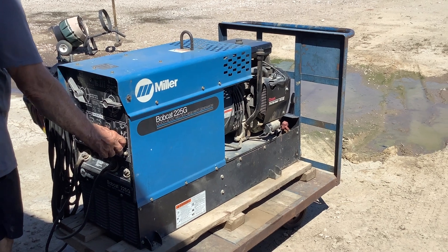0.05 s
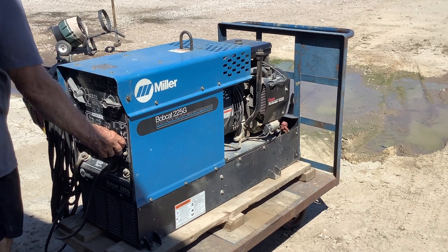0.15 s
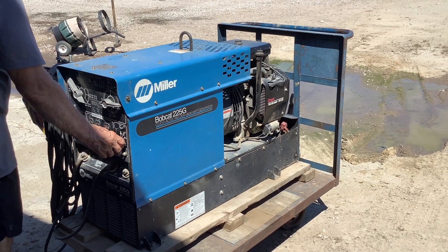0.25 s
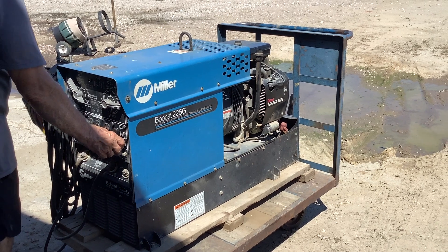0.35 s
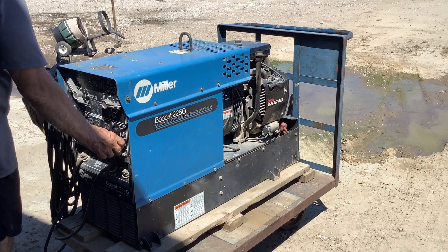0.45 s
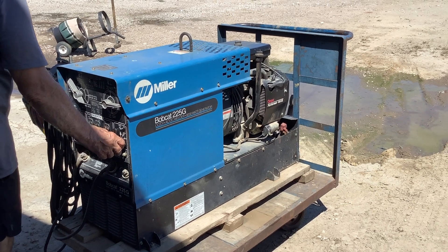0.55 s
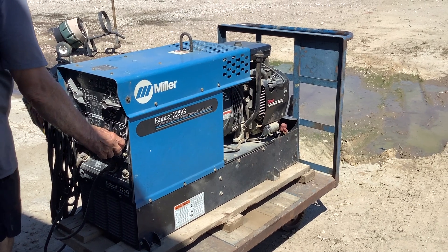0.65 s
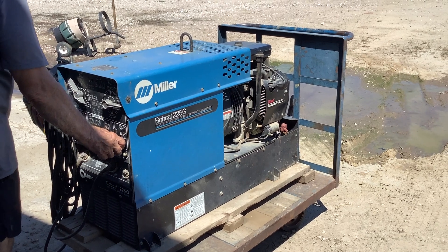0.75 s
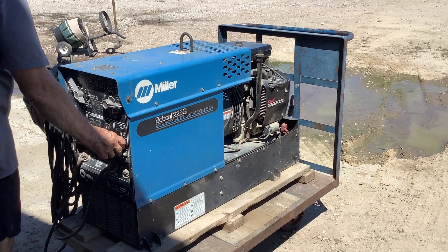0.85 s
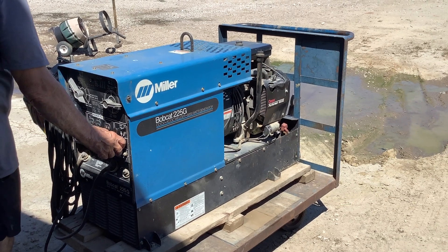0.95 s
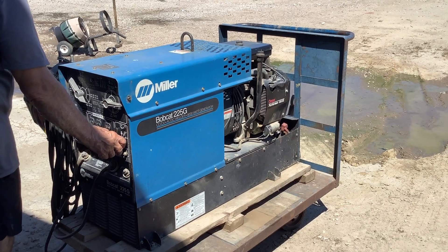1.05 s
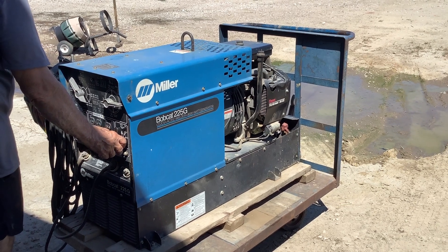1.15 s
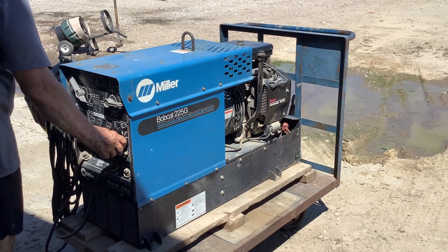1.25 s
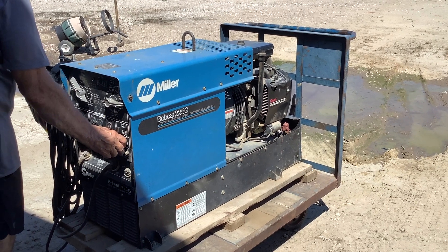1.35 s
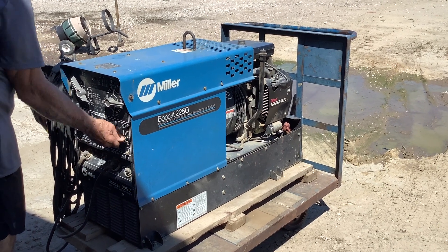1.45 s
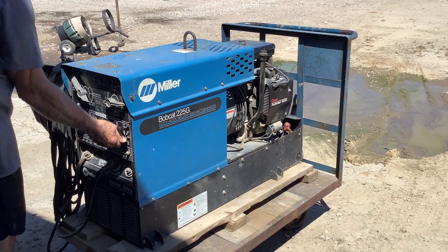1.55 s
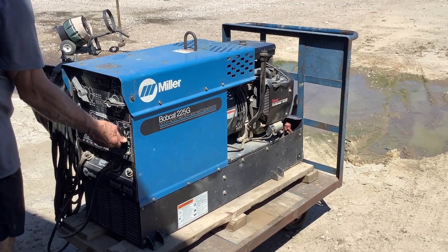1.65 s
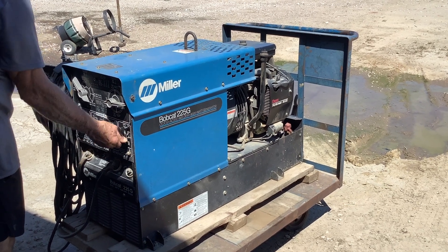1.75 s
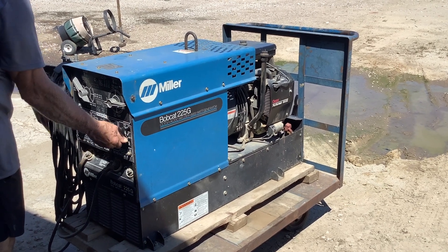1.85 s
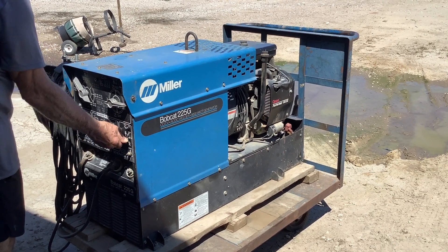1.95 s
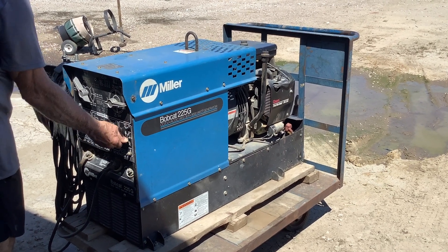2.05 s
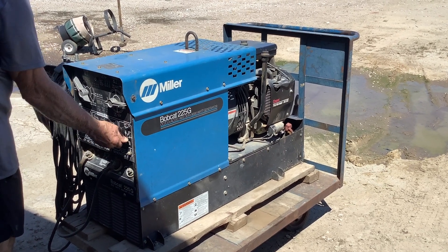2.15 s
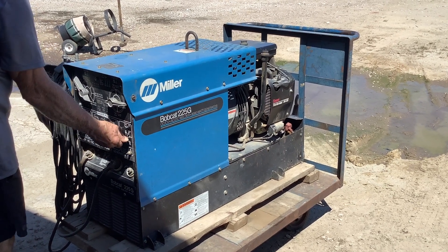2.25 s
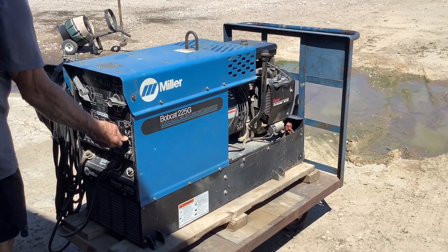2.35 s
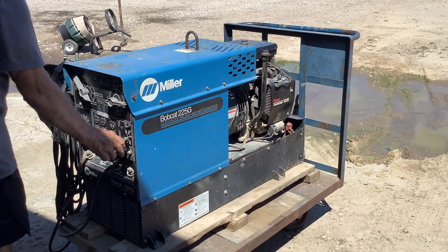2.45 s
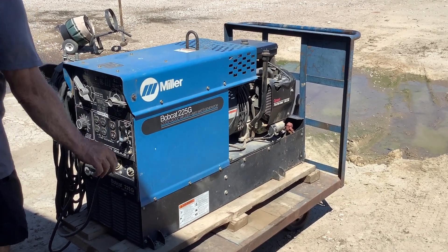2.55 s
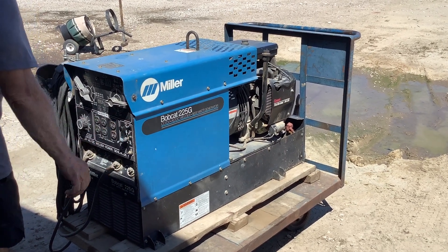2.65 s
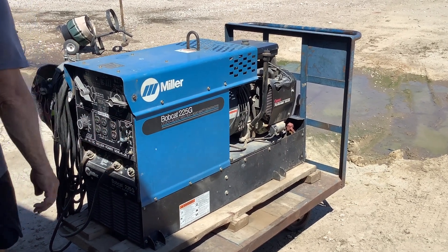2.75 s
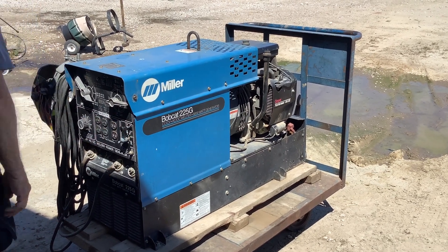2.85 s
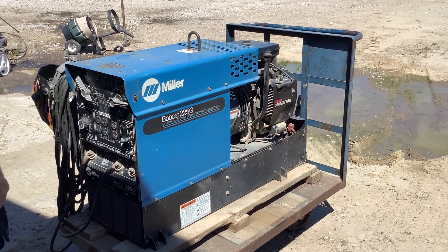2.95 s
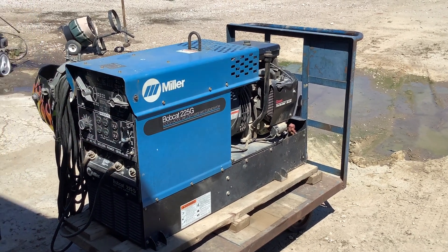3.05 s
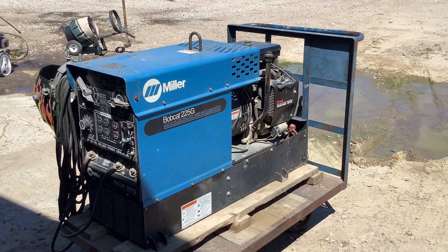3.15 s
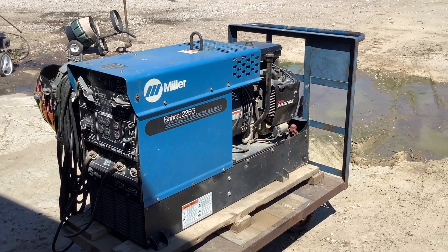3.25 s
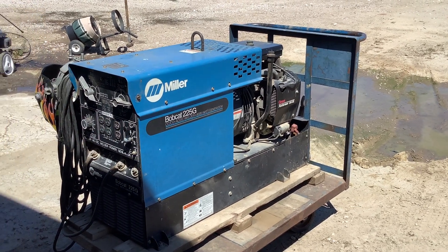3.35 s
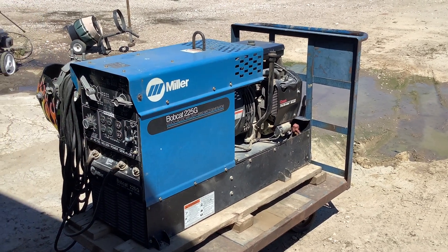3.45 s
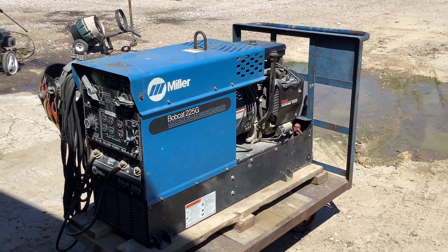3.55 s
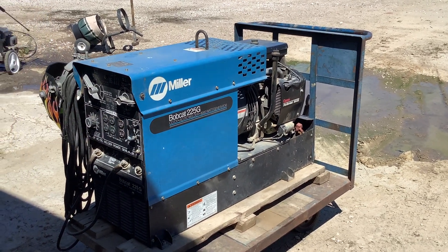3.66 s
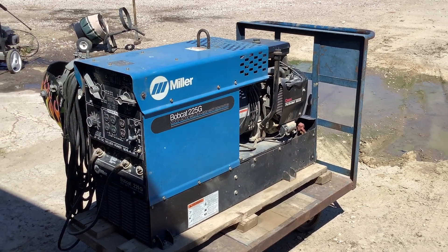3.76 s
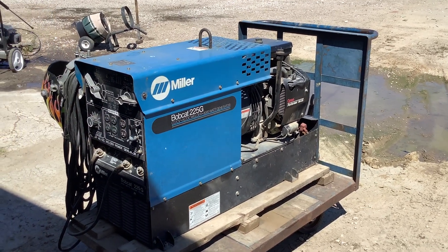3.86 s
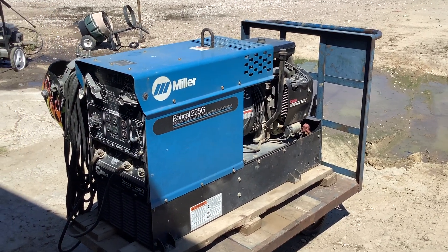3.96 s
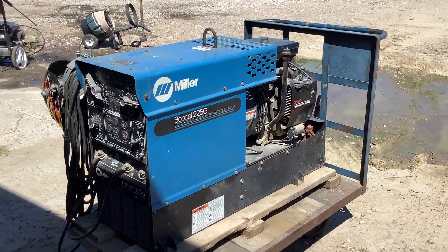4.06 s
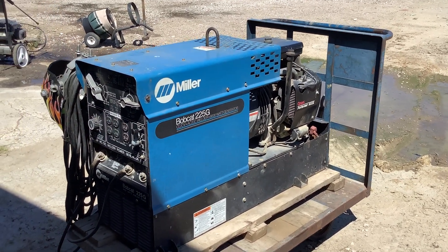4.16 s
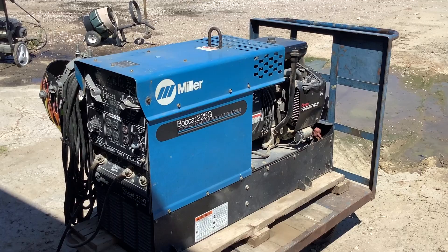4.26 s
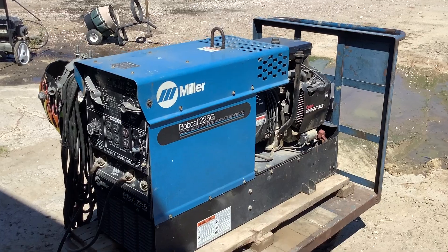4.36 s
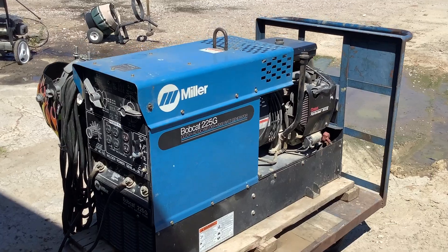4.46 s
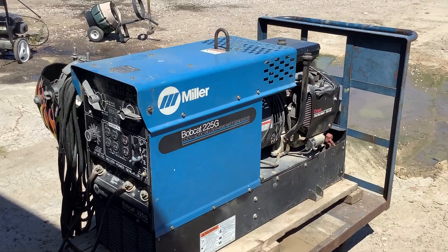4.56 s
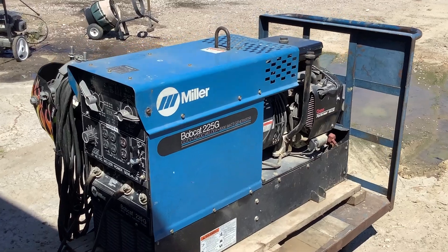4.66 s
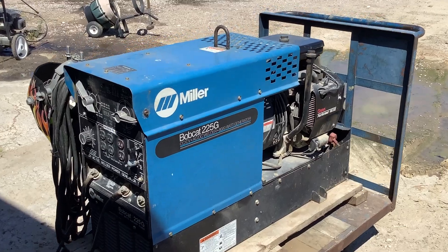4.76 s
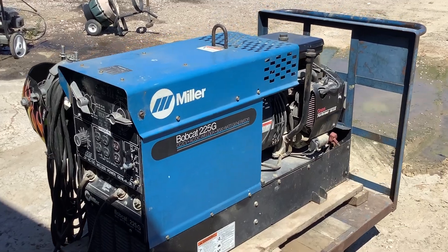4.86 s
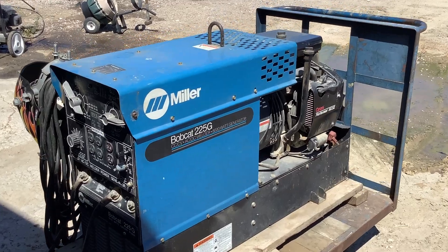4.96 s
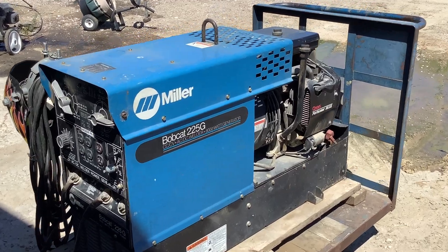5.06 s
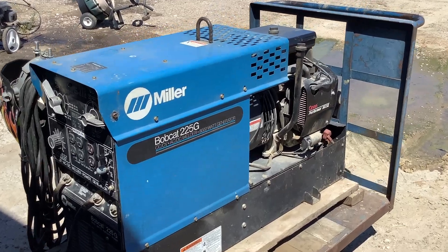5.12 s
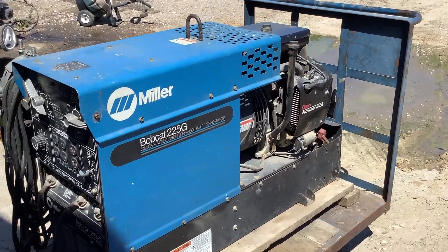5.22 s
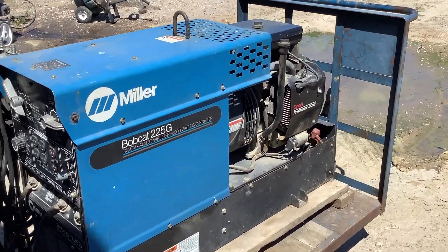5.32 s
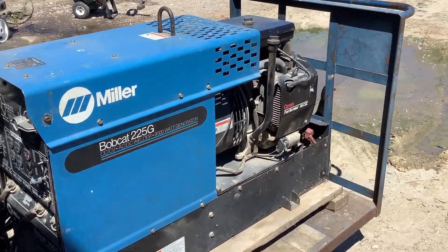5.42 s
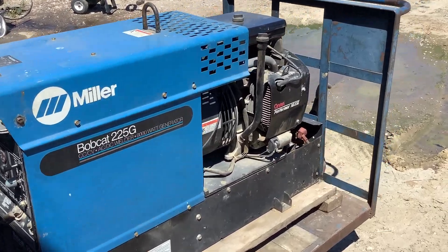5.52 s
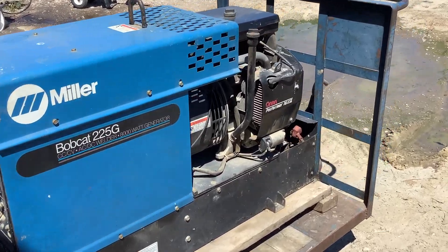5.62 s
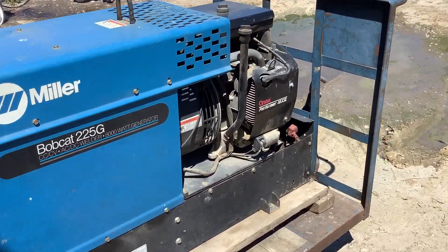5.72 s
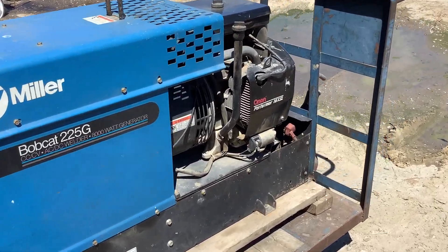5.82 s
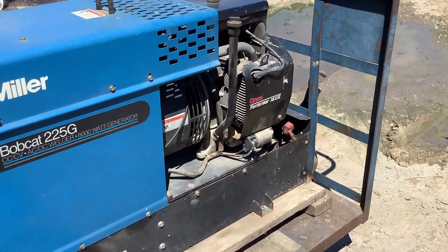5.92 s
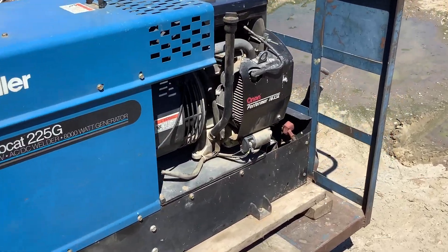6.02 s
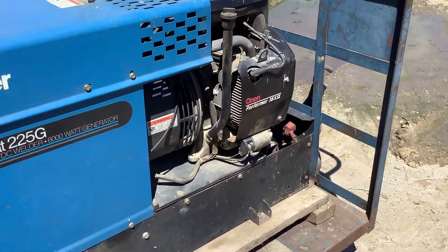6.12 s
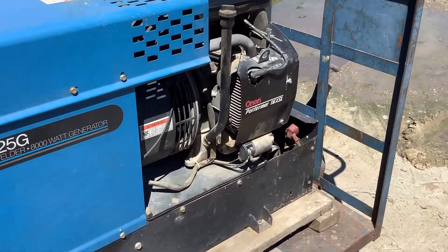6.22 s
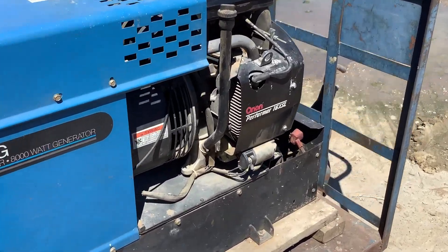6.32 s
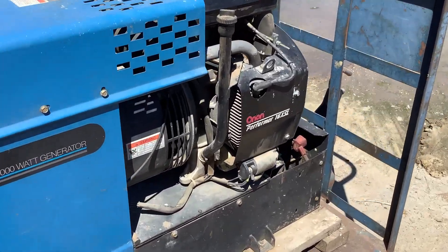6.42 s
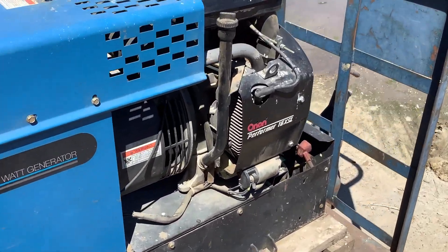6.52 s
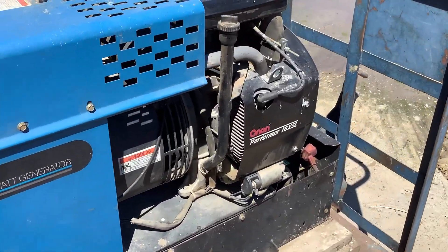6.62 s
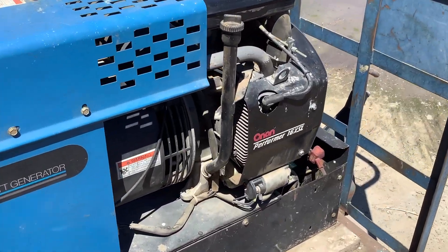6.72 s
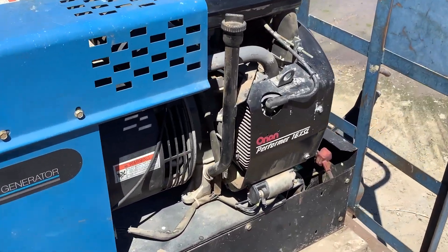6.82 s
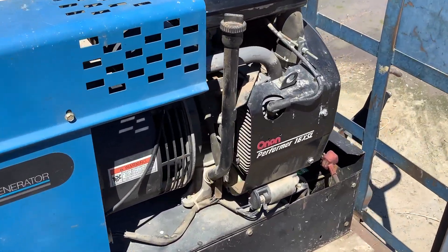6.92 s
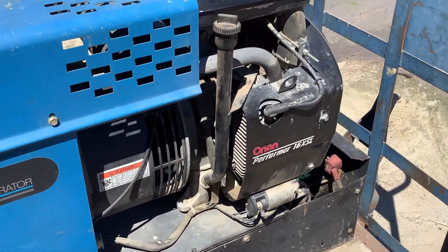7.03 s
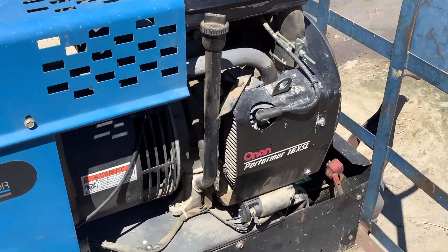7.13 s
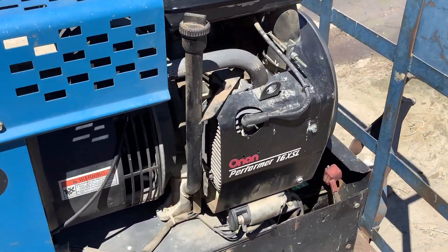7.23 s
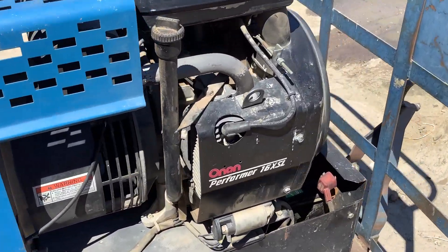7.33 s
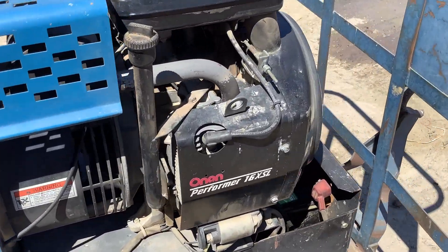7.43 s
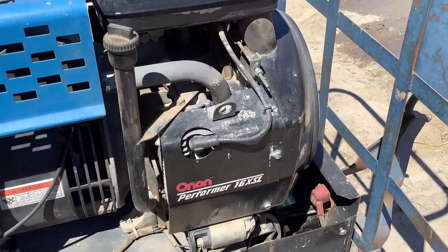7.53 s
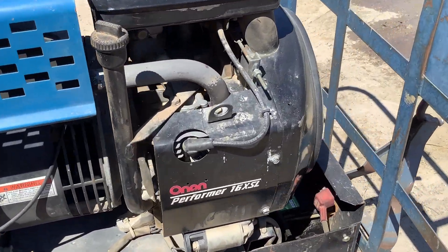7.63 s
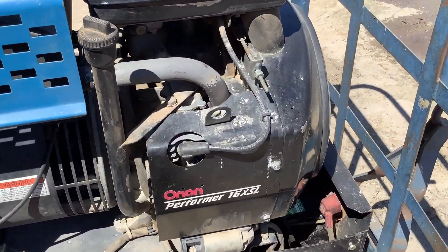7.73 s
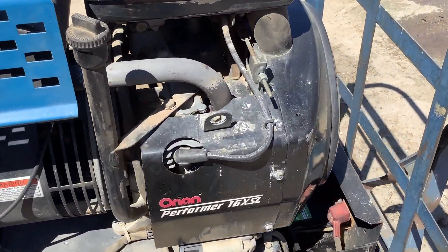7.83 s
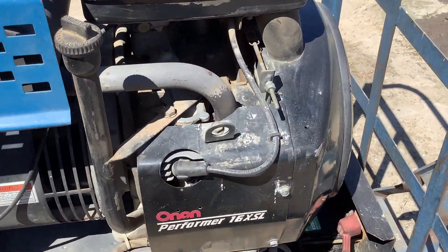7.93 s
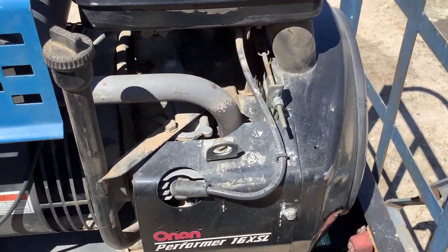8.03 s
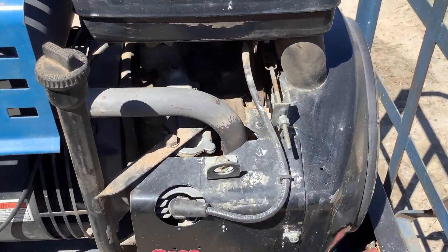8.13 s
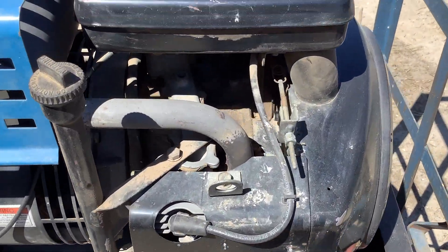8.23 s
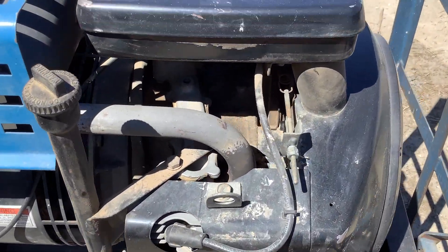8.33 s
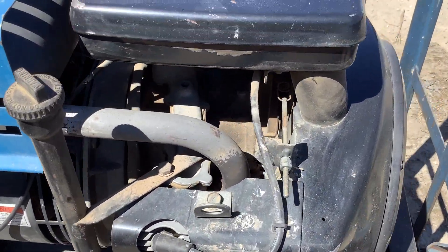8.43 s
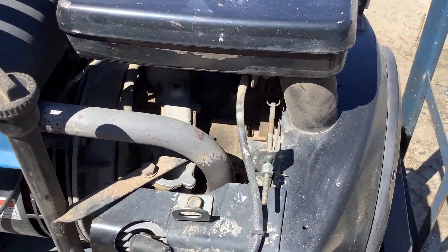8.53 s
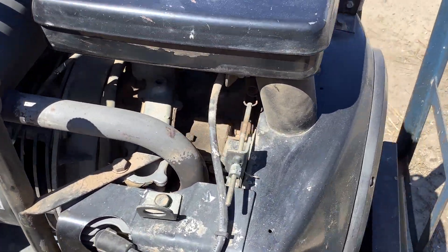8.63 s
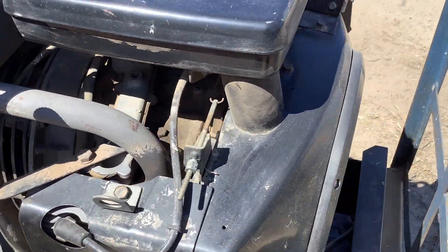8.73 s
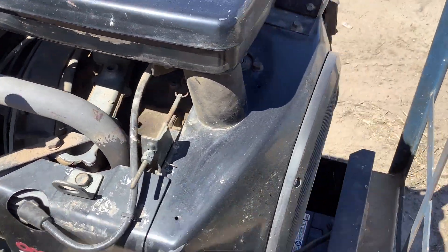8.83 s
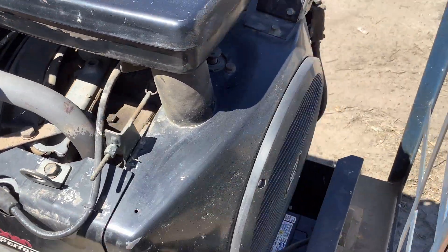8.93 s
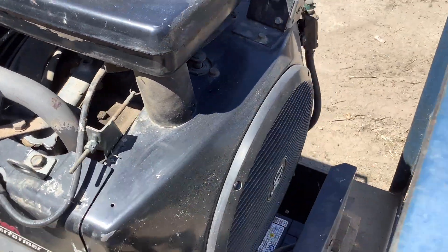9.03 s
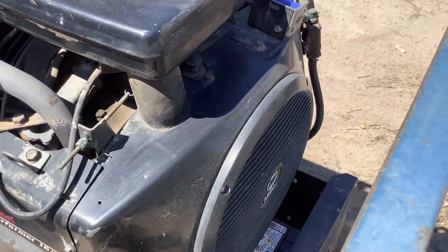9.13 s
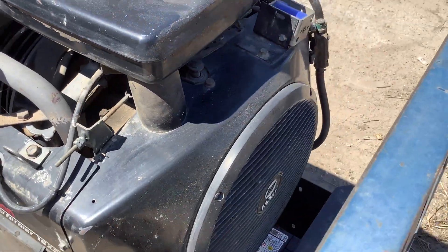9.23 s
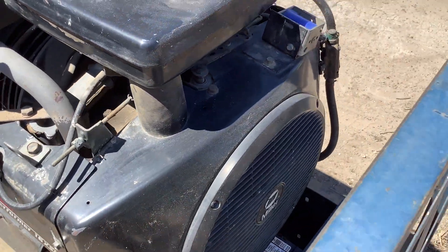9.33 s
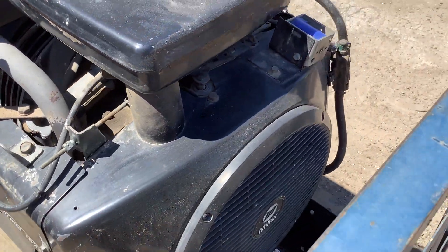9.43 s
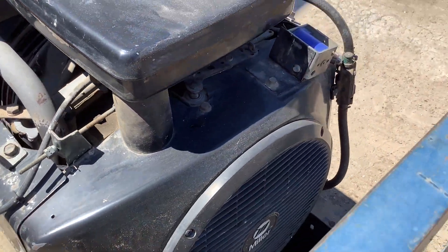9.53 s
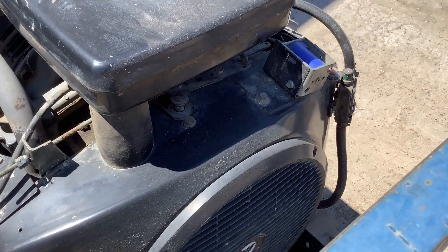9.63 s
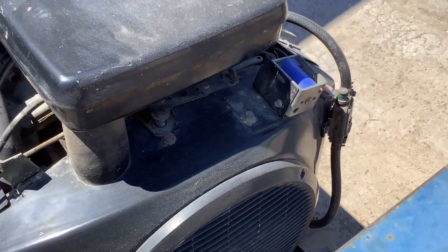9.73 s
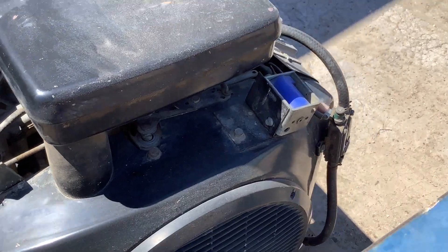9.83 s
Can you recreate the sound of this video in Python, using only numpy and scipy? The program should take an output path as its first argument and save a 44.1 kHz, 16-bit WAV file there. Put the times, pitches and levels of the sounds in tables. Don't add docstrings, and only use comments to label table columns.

```python
import sys
import numpy as np
from scipy import signal
from scipy.io import wavfile

SR = 44100
rng = np.random.default_rng(int(sys.argv[2]) if len(sys.argv) > 2 else 0)


def transcribe(signal):
    frames = np.atleast_2d(signal).T
    limited = np.clip(frames, -1, 1)
    pcm = np.round(limited * 32767).astype(np.int16)
    wavfile.write(sys.argv[1], SR, pcm)


def natural_amplitude(level_db):
    exponent = np.asarray(level_db, float) / 20
    return 10 ** exponent


N = 435708
T = np.arange(N) / SR


def unit(x):
    return x / np.sqrt(np.mean(x ** 2) + 1e-20)


def white():
    return rng.standard_normal(N)


def butter(x, order, hz, kind="low"):
    return signal.sosfilt(signal.butter(order, hz, kind, fs=SR, output="sos"), x)


def curves(rows):
    s, *columns = np.transpose(rows)
    return [np.interp(T, s, c) for c in columns]


def swell(s, width_s, lift):
    return lift * np.exp(-((T - s) / width_s) ** 2)


def drift(rate_hz):
    r = np.exp(-80 * np.pi * rate_hz / SR)
    draws = rng.standard_normal(N // 40 + 2002)
    slow = signal.lfilter([1], [1, -2 * r, r * r], draws)[2000:]
    return np.interp(np.arange(N) / 40, np.arange(len(slow)), unit(slow))


def clicks(times_s, heights):
    out = np.full(N, 1e-18)
    np.add.at(out, (np.asarray(times_s) * SR).astype(int), heights)
    return out


def resonate(x, peaks):
    out = 0
    for k, (hz, width_hz, db) in enumerate(peaks):
        r = np.exp(-np.pi * width_hz / SR)
        poles = [1, -2 * r * np.cos(2 * np.pi * hz / SR), r * r]
        out = out + (-1) ** k * natural_amplitude(db) * signal.lfilter([1 - r, 0, r - 1], poles, x)
    return out


def noise(spectrum, patchy_db):
    hz, db = np.transpose(spectrum)
    octaves = np.log2(min(hz[-1], 17000) / hz[0])
    edges = hz[0] * 2 ** np.arange(0, octaves + .34, 1 / 3)
    sources, out = rng.standard_normal((2, N)), 0
    for k, (low, high) in enumerate(zip(edges, edges[1:])):
        band = butter(sources[k % 2], 2, [low, high], "band")
        level_db = np.interp(np.log(low * high) / 2, np.log(hz), db)
        out = out + band * natural_amplitude(level_db + patchy_db * (drift(0.43) + 1.1 * drift(19.0)))
    return unit(out)


def bursts(rows):
    high = low = 0
    for s, db, length_s, share_db in rows:
        rise = np.clip((T - s) / 0.0043, 0, 1)
        shape = natural_amplitude(db) * rise * np.exp(-np.abs(T - s) / length_s)
        high = high + shape
        low = low + shape * natural_amplitude(share_db)
    return high, low


# t/s, peak level/dB, rise/s, fall/s (each per 20 dB)
GUSTS = [(.055, -53, .08, .08), (.205, -48, .03, 0.085), (.325, -44, .03, .05), (.357, -39.5, 0.037, 0.022),
         (.495, -46, 0.11, .03), (.58, -46.5, 0.13, 0.055), (.63, -47, .03, 0.066), (.7, -49, .03, .06),
         (.8, -49, 0.056, .07), (.998, -50, .04, .05), (1.11, -52.5, 0.071, .15), (1.3, -50, 0.087, 0.28),
         (1.395, -44, 0.02, 0.08), (1.45, -42.5, 0.046, 0.072)]


def wind():
    calm_db, span_db = -61, 20
    gusts_db = [db - span_db * np.maximum((s - T) / rise_s, (T - s) / fall_s) for s, db, rise_s, fall_s in GUSTS]
    wind_db = np.maximum(np.max(gusts_db, axis=0), calm_db)
    gust_db = wind_db + 2.0 * drift(25.0)
    lumps = unit(butter(white(), 2, [45.0, 150.0], "band"))
    slaps = unit(butter(white(), 3, [130.0, 500.0], "band"))
    return (natural_amplitude(gust_db) * lumps + natural_amplitude(1.5 * gust_db + 13.0) * slaps) * (T < 1.53)


# f/Hz, level/dB per Hz
YARD = [(180, -26), (300, -4.5), (1190, -19), (1720, -17.5), (3350, -31), (4750, -22.5), (6410, -34),
        (7320, -27.5), (12300, -31), (16000, -38)]


def yard():
    return natural_amplitude(-71) * noise(YARD, patchy_db=.4)


# t/s, peak level/dB
LENS_TICKS = [(0.3137, -61), (0.7622, -70), (0.7801, -64), (0.8135, -65), (1.0774, -63), (1.1618, -66),
              (1.1947, -64), (1.3613, -66)]


def lens_motor():
    steady_s = np.arange(.0288, 1.5, 1 / 30)
    ticks = clicks(steady_s, natural_amplitude(-42.5 + rng.normal(0, 3.0, len(steady_s))))
    ticks += clicks([s for s, db in LENS_TICKS], [natural_amplitude(db + 19.5) for s, db in LENS_TICKS])
    return resonate(ticks, [(4630, 700, 0), (5700, 700, -1.5)])


# f/Hz, level/dB, t60/s
SWITCH = [(540, -21, 0.018), (794, -26, 0.0065), (2780, -14.5, 0.0076), (4150, -24, 0.002),
          (5830, -15, 0.0024), (8000, -16, 0.0022)]
# f/Hz, width/Hz, level/dB
PANEL_RUSTLE = [(650, 400, 2), (2400, 500, 3), (2900, 500, 2), (4500, 2000, -8), (8500, 4000, -9.5)]


def switch():
    switch_s, panel_lag_s, panel_top_hz = .1814, .0017, 1000
    out, age = np.zeros(N), np.maximum(T - switch_s, 0)
    for hz, db, t60_s in SWITCH:
        is_panel = hz < panel_top_hz
        late = np.maximum(age - panel_lag_s * is_panel, 0)
        out += (-1) ** is_panel * natural_amplitude(db - 60 * late / t60_s) * np.sin(2 * np.pi * hz * late)
    rustle = natural_amplitude(-41.5 - 60 * age / 0.22) * (age > 0) * (age < .105)
    rustle += natural_amplitude(-51.0) * np.exp(np.minimum(T - switch_s, 0) / 0.0065) * (age == 0)
    out += rustle * unit(resonate(white(), PANEL_RUSTLE))
    return butter(out, 2, 11000.0)


# t/s, gear mesh f/Hz, ringing grind level/dB
STARTER = [(1.57, 203.7, -31.5), (1.62, 280, -20.5), (1.68, 396, -20.5), (1.725, 434.5, -17.5),
           (1.772, 380, -20), (1.818, 529, -25), (1.905, 581, -20.5), (1.945, 525, -17.5), (2.04, 407, -15)]
# multiple, level/dB
MESH = [(1, 2), (2, 7.5), (3, 7), (4, 6), (5, 5), (6, 0)]
# f/Hz, width/Hz, level/dB
RING_GEAR = [(3060, 31, -12), (3560, 34, -8), (3770, 62, -5), (4200, 110, -5), (4490, 53, 0),
             (4690, 41, -2), (5020, 20, -1), (5300, 70, -7), (6100, 57, -17), (7120, 110, -14),
             (7430, 84, -14), (11800, 58, -16)]
HOUSING = [(800, 39, 2), (1096, 30, 7), (1400, 19, 8), (1680, 140, 1), (2110, 79, 0), (2340, 200, -5)]
PINION = [(4815, 57, 19), (7300, 870, -5.5), (11900, 500, -6)]
SOLENOID = [(70, 23, -12), (142, 5.5, -2), (294, 21, -4.5), (450, 16, -1.5)]
# f/Hz, width/Hz, level/dB
BELL = [(2120, 48, 3), (1640, 75, -8), (2320, 100, -2)]
KNOCK_BODY = [(770, 110, 4), (1474, 91, 8.5), (2060, 86, 7.5), (2290, 220, 4.5), (2950, 550, -23)]
CLUNK = [(300, 90, -3), (860, 160, 0), (1630, 260, 3)]
# f/Hz, level/dB per Hz
GRIND = [(59, -49), (100, -13), (343, -8), (433, -2), (608, 0), (1080, -1), (1870, 2), (2080, 2),
         (2580, -3.5), (4570, 0.5), (5900, -13), (8500, -11), (12100, -13), (14000, -16), (16000, -28)]
# t/s, grind level/dB, length/s, ringing share/dB
JOLTS = [
    (1.519, -13, 0.01, -24),
    (1.762, -34, 0.014, -22),
    (1.962, -16.5, 0.021, -22),
]
# t/s, peak level/dB, length/s, housing share/dB
KEY = [(1.387, -49, 0.003, 12), (1.412, -56, 0.003, 14), (1.426, -34, 0.02, -9), (1.438, -45, 0.03, 8),
       (1.452, -23, 0.019, -27), (1.484, -43, 0.017, 3), (1.506, -7.5, 0.017, -5)]
# t/s, peak level/dB, length/s, housing share/dB
KNOCKS = [(2.046, 11.5, 0.0057, -7), (2.058, -5.5, 0.019, 4.5), (2.068, -16, 0.015, 6),
          (2.0774, -12.5, 0.04, 3), (2.165, -8, 0.012, 6), (2.174, -14, 0.026, 8.5),
          (2.243, -10.5, 0.018, 5), (2.263, -18.5, 0.024, 10), (2.312, -12, 0.01, 6),
          (2.322, -9.5, 0.015, 6.5), (2.376, -8.5, 0.012, 9), (2.385, -14.5, 0.025, 8),
          (2.427, -16, 0.015, 11), (2.44, -7, 0.0096, 8.5), (2.456, -21, 0.012, 16),
          (2.466, -24, 0.012, 10), (2.555, -24, 0.012, 2)]


def starter():
    engage_s, release_s, stop_s, overrun_end_s = 1.518, 1.945, 2.04, 2.64
    mesh_hz, effort_db = curves(STARTER)
    freed_s = np.maximum(T - release_s, 0)
    fade_db = np.maximum(-702 * freed_s, -39 - 156 * freed_s - effort_db)
    whine_db = -33.5 + 6 * np.log2(mesh_hz / 400) + 2 * fade_db
    grind_db = -22.5 + 0.57 * (effort_db + 20.5) + fade_db
    jolt, jolt_ring = bursts(JOLTS)
    on = np.clip((T - engage_s) / 0.0023, 0, 1) * (T < stop_s)

    teeth = np.cumsum(mesh_hz * (1 + .006 * drift(50.0))) / SR
    whine = sum(natural_amplitude(db + 1.5 * drift(15.0)) * np.sin(2 * np.pi * k * teeth) for k, db in MESH)
    whine = butter(.65 * whine + 1.2 * resonate(whine, HOUSING), 6, 2300)

    grit = white() * natural_amplitude(0.61 * drift(130.0))
    ring = lambda peaks: unit(resonate(grit, peaks))
    steel, housing, pinion = ring(RING_GEAR), ring(HOUSING), ring(PINION)
    broad = noise(GRIND, patchy_db=2.0)
    sizzle = unit(np.diff(broad, prepend=0))
    singing = steel + .6 * pinion + 0.25 * housing + 0.5 * ring(BELL)
    grinding = natural_amplitude(whine_db) * whine + (natural_amplitude(grind_db) + jolt) * broad
    grinding += (natural_amplitude(effort_db + fade_db) + jolt_ring) * singing

    thud = natural_amplitude(-42.0 - 40.0 * (T - 1.89)) * (T > 1.52) * ring(SOLENOID)
    clunk_s = .02
    thud += swell(engage_s + clunk_s / 2, clunk_s, natural_amplitude(-20)) * ring(CLUNK)

    rattle = np.clip(np.minimum(T - release_s, (overrun_end_s - T) / 2) / 0.018, 0, 1)
    overrun = natural_amplitude(-37.5) * rattle * (broad + 1.54 * ring([(380, 170, 0)]))

    high, low = bursts(KNOCKS + KEY)
    knocks = high * (0.092 * steel + 0.06 * pinion + 0.075 * broad + 0.013 * sizzle)
    knocks += low * (0.091 * housing + 0.12 * ring(KNOCK_BODY) + 0.067 * ring(PINION[1:]))
    return on * (grinding + thud) + overrun + knocks


# t/s, start f/Hz, peak level/dB
CHIRPS = [(2.42, 680, -22), (2.455, 760, -27), (2.525, 700, -20), (2.9, 660, -21), (1.5, 820, -26)]


def chirps():
    length_s, hz_per_s, out = 0.01, 5200, 0
    for s, hz, db in CHIRPS:
        age = np.clip(T - s, 0, .1)
        out = out + swell(s + length_s, length_s, natural_amplitude(db)) * np.sin(2 * np.pi * (hz + hz_per_s * age / 2) * age)
    return out


# delay/ms, sway/ms, level/dB
ECHOES = [(3.3, .5, -17), (7.7, .6, -15), (12.9, .6, -15), (21.0, .6, -16)]


def echoes(x):
    out = x
    for ms, sway_ms, db in ECHOES:
        delay_s = (ms + sway_ms * drift(0.1502)) / 1000
        out = out + natural_amplitude(db) * np.interp(T - delay_s, T, x)
    return out


def whoop():
    age = T - 4
    hz = 860 + 1100 * age + 1700 * age ** 2 + 35 * drift(60.0)
    glide = np.sin(2 * np.pi * np.cumsum(hz) / SR)
    return swell(4, 0.25, natural_amplitude(-28 + 3.0)) * (0.55 + 0.71 * drift(30.0)) * glide


# f/Hz, level/dB per Hz
RASP = [(41, -37), (70, -17), (128, -16.5), (158, -7), (184, -10.5), (281, -5.5), (400, -6.5), (560, -5),
        (730, -6.5), (860, -7.5), (1080, -9), (1180, -9), (1630, -10), (1980, -12.5), (2370, -22.5),
        (2600, -15.5), (3380, -38.5), (5720, -120)]
CLATTER = [(1350, -40), (2300, -8), (3080, 2.5), (3820, -1), (4190, 1), (5250, 2), (5880, -7.5),
           (6400, -17), (6600, -16), (8580, -48), (14500, -120)]
AIR = [(3530, -31), (6000, 1), (6400, 5), (7080, -4), (7500, 5), (10800, 5), (12900, 2.5), (15100, -15),
       (15800, -15)]
# f/Hz, width/Hz, level/dB
PANEL_MODES = [
    [(180, 97, 0)],
    [(531, 53, 0)],
    [(685, 71, 0)],
    [(2030, 45, 0)],
    [(4110, 120, 3), (5620, 400, 3), (7110, 350, -1)],
    [(1590, 130, -2), (1450, 140, -4.5)],
    [(1040, 81, 0)],
]
# (t/s, width/s, lift/dB)
SYMPATHY = [(-50, [(2.7, 0.63, 21.5), (4.0, 0.86, 25), (9.6, 0.94, 18)]), (-41.5, [(4.85, 0.18, 17.5),
            (5.95, 0.26, 11.5), (6.6, 0.96, 14.5), (9.88, 0.54, 14.5)]), (-43, [(2.55, 0.041, 1),
            (3.1, 0.48, 14.5), (4.6, 0.76, 17.5), (6.3, 0.61, 6), (9.88, 0.7, 10)]),
            (-45.5, [(2.5, 0.05, 8), (2.95, 0.38, 4.5), (3.8, 0.87, 13.5), (5.15, 0.62, 11),
            (8.8, 0.32, 14.5)]), (-38.5, [(2.8, 0.049, 4.5), (3.8, 0.17, 9.5), (8.8, 0.68, 4.5)]),
            (-45.5, [(4.4, 0.72, 17), (6.6, 1, 21)]), (-50, [(4.4, 0.48, 16), (5.9, 0.5, 21),
            (7.9, 0.4, 13)])]
# (t/s, width/s, share)
SHADOW = (2290, 190, [(6.85, 0.51, 0.58), (9.3, 0.35, 0.28)])


def roar(rate, throttle, turns, law):
    running = np.clip((T - 2.36) / 0.041, 0, 1)
    since_firing = (turns + .11) % 1 / rate
    since_cycle = (turns / 2 % 1) * 2 / rate
    blur = np.minimum(30 / rate, 1) ** 2
    puff = 1 + 1.15 * blur * np.exp(-since_firing / 0.0086)
    gulp_db = swell(3.76, 0.23, 2.8)
    slow = running * (30 / rate) ** 1.1 * natural_amplitude(2 * gulp_db - 1)
    force = natural_amplitude(rng.normal(0, 4.0, 600))[(turns - np.floor(turns[0])).astype(int)]
    cycle_clack = 1.2 * blur * np.exp(-(since_cycle / 0.013) ** 2)
    turn_clack = 1.26 * np.exp(-((turns % 1) / rate / 0.0079) ** 2)
    clack = 1 + slow * force * (cycle_clack + turn_clack)

    out = natural_amplitude(law['rasp'] + 4.5) * puff * noise(RASP, patchy_db=-0.78)
    out += clack ** np.sqrt(blur) * natural_amplitude(law['clatter'] - 1.0) * noise(CLATTER, patchy_db=.4)
    hiss = unit(butter(white(), 2, [11500.0, 17000.0], "band"))
    intake = natural_amplitude(-7) * np.clip(6.0 - T, .2, 1) * hiss
    out += clack * natural_amplitude(law['air'] + 0.5 + gulp_db) * (noise(AIR, patchy_db=.4) + intake)

    shake = white() * (1 + 2.3 * blur * np.exp(-since_firing / 0.0044))
    for modes, (db, moments) in zip(PANEL_MODES, SYMPATHY):
        out += natural_amplitude(db + sum(swell(*m) for m in moments)) * unit(resonate(shake, modes))
    out += whoop()
    shade_hz, shade_width_hz, shades = SHADOW
    out -= sum(swell(*m) for m in shades) * resonate(out, [(shade_hz, shade_width_hz, 0)])
    return natural_amplitude(-1.0) * echoes(out) * np.clip((T - 1.96) / 0.016, 0, 1)


# t/s, peak level/dB
CATCHES = [(2.01, -17), (2.125, -16), (2.199, -14), (2.281, -13), (2.357, -15), (2.419, -12)]
# f/Hz, width/Hz, level/dB
SILENCER = [(66, 30, 0), (130, 60, -6), (340, 120, -12), (720, 200, -18)]


def thumps(throttle, turns):
    fired_s = np.flatnonzero(np.diff(np.floor(turns + 0.099)) * (T[1:] > 2.45)) / SR
    uneven = clicks(fired_s, rng.normal(0.18, 1, 600)[:len(fired_s)] * natural_amplitude(-35.0))
    first = clicks([s for s, db in CATCHES], [natural_amplitude(db) for s, db in CATCHES])
    first = signal.lfilter(*signal.butter(3, 125.0, fs=SR), first)
    first = natural_amplitude(48.5) * resonate(first, [(69.0, 10.0, 1.5), (124, 50, -9.0)])
    return natural_amplitude(47.0 + 3.1 * throttle) * resonate(uneven, SILENCER) + first


# f/Hz, level/dB at full speed and throttle
PIPE = [(20, -64), (47, -25), (63, -16.5), (86, -20.5), (100, -18.5), (118, -23.5), (160, -24.5),
        (190, -27)]


def exhaust_db(rate, throttle, near):
    hz, db = np.transpose(PIPE)
    shut_db, near_db, levels = (-4.5, -9, 1.2), (-3, -1.5, 5.5), []
    for k in range(3):
        pipe_db = np.interp(np.log((k + 1) * rate), np.log(hz), db)
        speed_db = 13 * np.log10(rate / GOVERNED_HZ)
        levels.append(pipe_db + speed_db + shut_db[k] * (1 - throttle) ** 2 + near_db[k] * near)
    one, two, three = levels
    null_hz, step_hz = 137.4, 13.6
    wall = .8 * np.clip(2 * throttle, 0, 1) * np.clip(rate / 10 - 3.4, 0, 1)
    comb = 1 + wall ** 2 - 2 * wall * np.cos(2 * np.pi * (3 * rate - null_hz) / step_hz)
    three = three + 10 * np.log10(comb / (1 + wall)) + swell(6.06, 1, 5.8)
    two = two + 20 * np.log10(np.abs(1 - 4.47 * near) + .03)
    return one, two, three


# multiple of firing rate, level/dB at full speed
ORDERS_DB = [(2.5, -40), (3.5, -37), (4, -29), (5, -33), (6, -34), (7, -39), (9, -39), (10, -37), (11, -36),
             (13, -41), (14, -38), (16, -41), (22, -40), (22.5, -40), (24, -40)]
# multiple, t/s, width/s, level/dB
SINGING = [(4, 2.75, .3, -35), (5, 3.25, .3, -35), (6, 3.25, .25, -35), (7, 3.0, .2, -39),
           (17, 3.36, .12, -28), (16, 3.47, .08, -34), (12, 3.65, .1, -35), (14, 4.0, .14, -33),
           (11, 4.7, .2, -35), (13, 5.35, .3, -35), (9, 5.9, .4, -34), (12, 6.8, .7, -36),
           (12, 7.9, .35, -36), (12, 9.5, .6, -37), (8, 8.1, .35, -33), (5, 4.15, .2, -36),
           (18, 9.4, .5, -39), (8, 4.05, .15, -36), (17.5, 3.62, .1, -32)]
# t/s, length/s, strength/0-1
MISFIRES = [(4.69, .23, 1.0), (5.925, .04, 1.1), (6.385, .035, .45), (9.56, .035, .4)]
# multiple, level/dB
LIMP = [(.5, -47.5), (1.5, -22), (2.5, -32), (3.5, -29), (4.5, -38)]


def orders(rate, throttle, near, turns, law):
    def tone(k, lag=None):
        lag = .137 * k ** 2 if lag is None else lag
        return np.sqrt(2) * np.sin(2 * np.pi * (k * turns + lag))

    def order(k, db, lag=None):
        return natural_amplitude(db + 0.53 * drift(3.3)) * tone(k, lag)

    limp = 0
    for s, length_s, share in MISFIRES:
        limp = limp + share * np.clip(np.minimum(T - s, s + length_s - T) / 0.004, 0, 1)

    one_db, two_db, three_db = exhaust_db(rate, throttle, near)
    out = order(1, one_db, 0) + order(2, two_db, .25) + order(3, three_db, 0)
    out += order(8, law['fan8'] + swell(6.8, 1, 13))
    out += order(12, law['fan12'])
    weak = 0
    for k, db in ORDERS_DB:
        can_db = throttle * 10 * np.exp(-((k * rate - 328) / 28) ** 2)
        weak = weak + order(k, db + drift(8.0) + can_db) * (rate / 60.4) ** (.15 * k)
    out += natural_amplitude(law['weak']) * weak
    out += sum(swell(s, width_s, natural_amplitude(db)) * tone(k) for k, s, width_s, db in SINGING)
    out *= 1 - 0.5 * np.minimum(limp, 1)
    out += limp * sum(order(k, db) for k, db in LIMP)
    return natural_amplitude(-0.66) * np.clip((T - 2.33) / 0.33, 0, 1) * out


# t/s, firing rate f/Hz
SPEED = [(2.4, 19.4), (2.63, 23.3), (3.02, 33.6), (3.42, 43.1), (3.75, 50.3), (3.92, 54.1), (4.05, 56.4),
         (4.27, 60.3), (4.5, 63.8), (4.69, 62.8), (5.04, 60.3), (5.57, 60.7), (6.3, 60.25), (6.85, 60.5),
         (7.45, 60.3), (8.6, 60.45), (9.36, 60.8), (9.88, 60.2)]
GOVERNED_HZ = 60.4
# t/s, throttle opening/0-1
THROTTLE = [(2.4, 0.4), (3.5, 0.5), (3.63, 0.86), (3.9, 0.94), (4.15, 0.8), (4.42, 0.26), (4.62, 0),
            (5.1, 0)]
# t/s, nearness to cylinders/0-1, gain/dB
WALK = [(5.15, 0, -2.5), (5.6, 0.06, 0.2), (6.11, 0.33, -0.9), (6.54, 0.57, 0), (7.27, 0.77, 0.2),
        (8.3, 0.97, 2.1), (9.3, 0.77, -2.5), (9.88, .98, -1)]
# level/dB at governed speed, slope/dB per dB speed, open throttle/dB, near/dB, walk gain share
LAWS = dict(rasp=(-21, 2, 2, -2.5, 0.66), clatter=(-27, 2.5, 5, -0.3, 0.78), air=(-36.5, 1.08, 5.5, -1, 1),
        fan8=(-39, 3.5, 22.5, 6.5, 0.8), fan12=(-36, 2, -1, 0, -1), weak=(-0.5, 0, 2.2, 0, 0.6))


def engine():
    (rate,), (throttle,), (near, walk_db) = curves(SPEED), curves(THROTTLE), curves(WALK)
    controls = [1, 20 * np.log10(rate / GOVERNED_HZ), throttle, near, walk_db]
    law = {name: sum(a * c for a, c in zip(row, controls)) for name, row in LAWS.items()}
    turns = np.cumsum(rate) / SR
    turns = turns - turns[int(2.937 * SR)]
    return roar(rate, throttle, turns, law) + thumps(throttle, turns) + orders(rate, throttle, near, turns, law)


# t/s, peak level/dB
TAPPETS = [(2.6495, -22), (2.7284, -21), (2.7673, -20), (2.8062, -30), (2.836, -13.5), (2.875, -25),
           (2.9065, -24), (2.9404, -25), (2.9713, -20), (2.9982, -22), (3.0601, -23), (3.1175, -18),
           (3.1694, -17), (3.1993, -17), (3.2257, -18), (3.3405, -19), (3.3684, -25), (3.3943, -23),
           (3.4203, -23), (3.4392, -22), (3.4836, -18), (3.5295, -23), (3.5679, -17), (3.6054, -17)]
# f/Hz, width/Hz, level/dB
TAPPET_RING = [(4540, 510, 10), (5250, 330, 5), (6060, 500, -4), (7100, 300, -12), (3100, 500, -13)]


def tappets():
    ticks, _ = bursts([(s, db - 8, 0.011, 0) for s, db in TAPPETS])
    return ticks * unit(resonate(white(), TAPPET_RING))


# f/Hz, width/Hz, level/dB
SHROUD = [(7100, 500, -5), (7950, 300, 0), (8600, 400, -1), (9300, 450, -1), (10300, 700, 1),
          (11300, 800, 0)]


def shroud():
    shiver = white()
    jingle = sum(natural_amplitude(4.0 * drift(5.0)) * resonate(shiver, [mode]) for mode in SHROUD)
    return natural_amplitude(-46 + swell(9.18, 0.65, 10)) * (T > 5) * unit(jingle)


def scene():
    background = wind() + yard() + lens_motor()
    return (background + switch() + starter() + chirps() + engine() + tappets() + shroud())[None]


def roll_off(x):
    return signal.sosfilt(signal.butter(12, 15830, fs=SR, output="sos"), x)


def record(dry):
    x = butter(dry, 3, 40.0, "high")
    x = .85 * np.tanh(x / .85)
    x = signal.sosfilt(signal.ellip(10, .5, 60, 15800, fs=SR, output="sos"), x)
    return roll_off(x)


dry = scene()
out = record(dry)
transcribe(out)
```